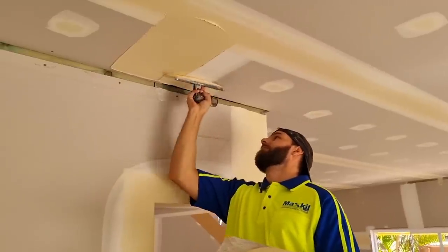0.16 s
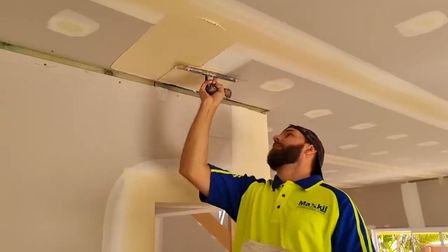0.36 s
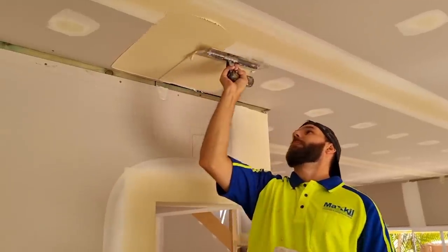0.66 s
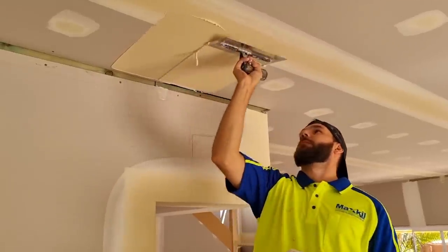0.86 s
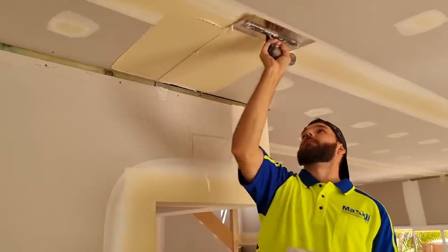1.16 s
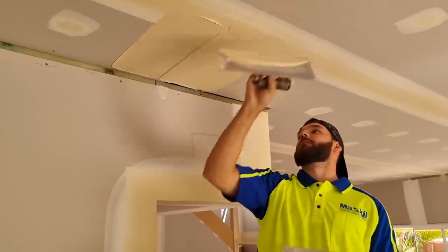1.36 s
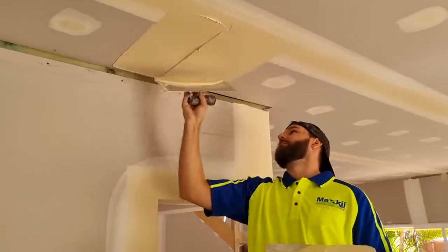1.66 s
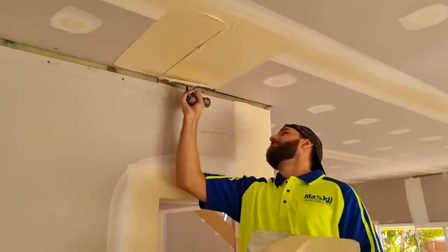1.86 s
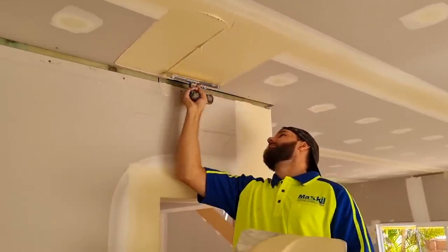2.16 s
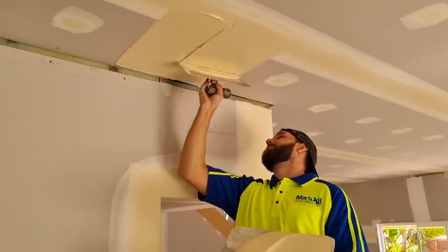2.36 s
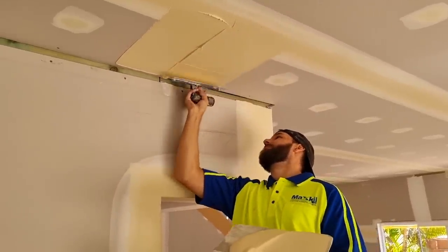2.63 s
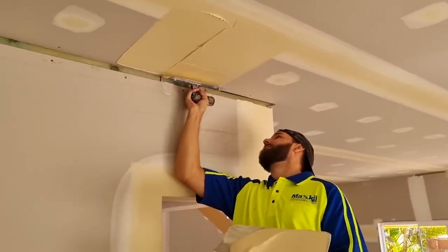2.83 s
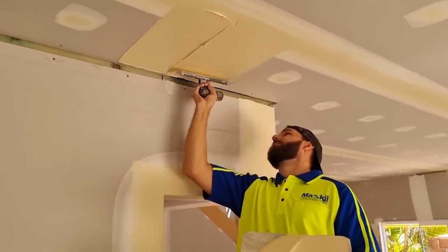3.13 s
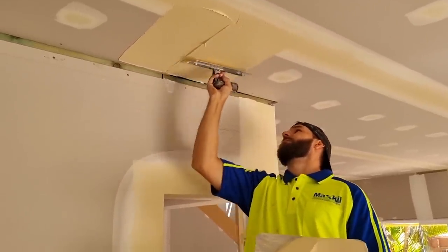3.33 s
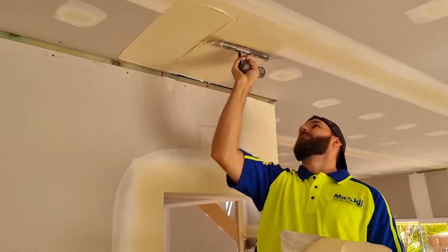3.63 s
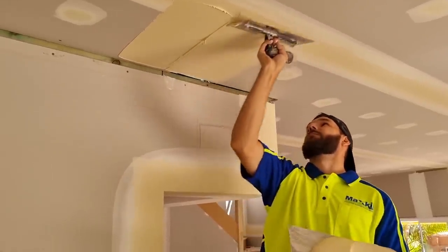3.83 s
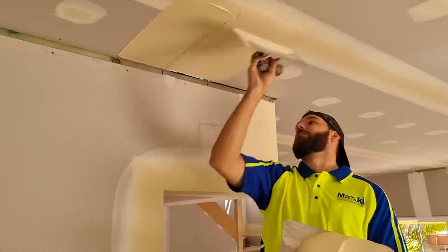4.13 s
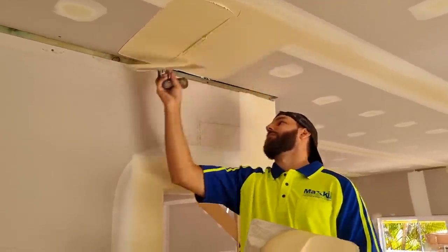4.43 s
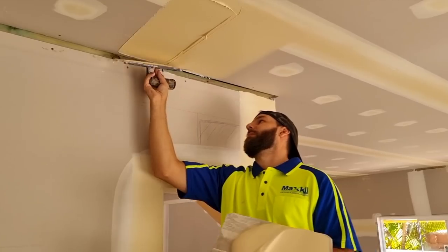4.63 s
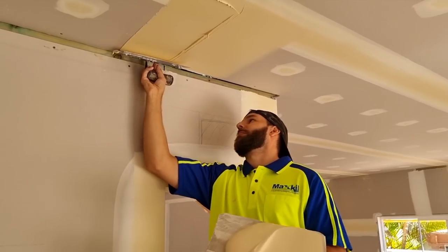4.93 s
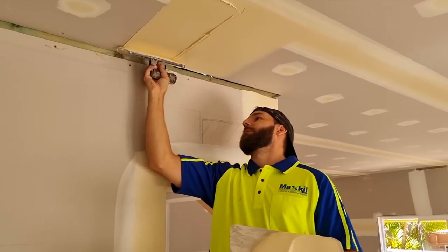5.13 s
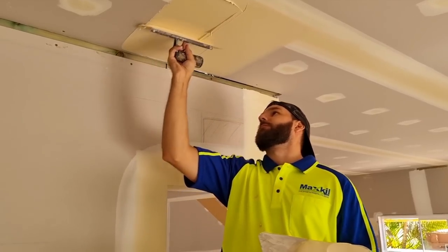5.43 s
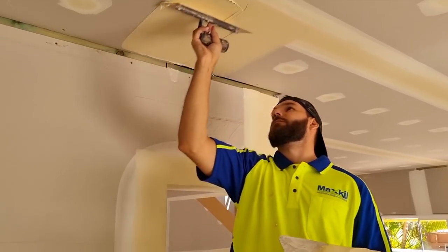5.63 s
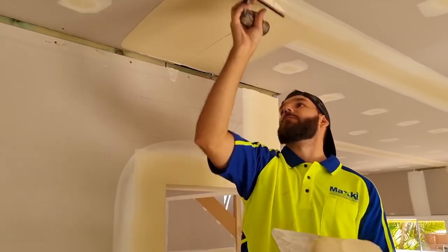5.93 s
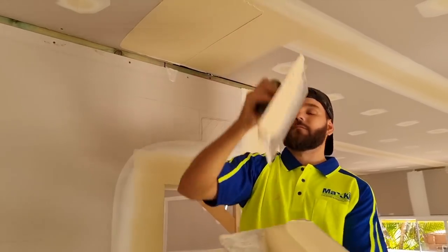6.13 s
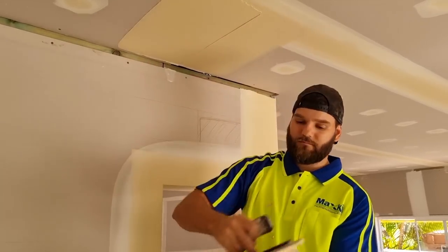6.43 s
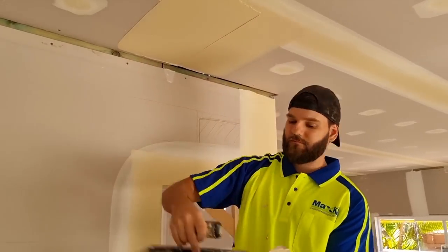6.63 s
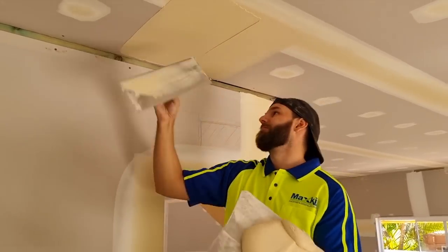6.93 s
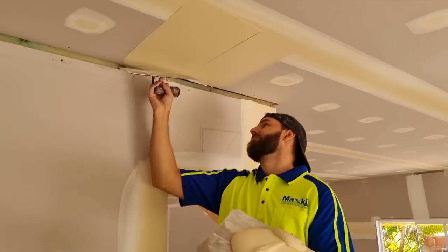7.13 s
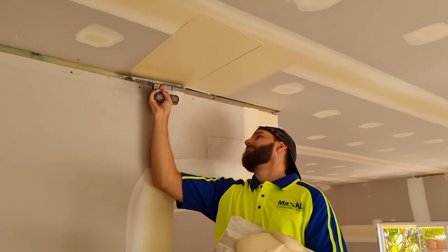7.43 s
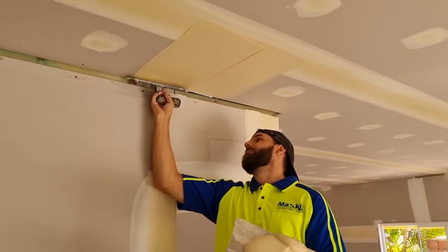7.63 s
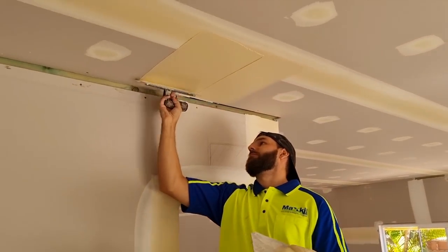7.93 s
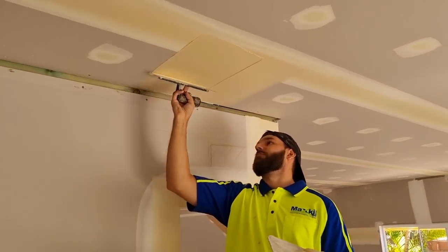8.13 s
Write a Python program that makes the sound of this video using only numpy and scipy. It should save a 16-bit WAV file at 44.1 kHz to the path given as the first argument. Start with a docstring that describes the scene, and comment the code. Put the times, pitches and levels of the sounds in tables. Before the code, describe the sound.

Gritty trowel strokes hiss over plasterboard, broken by steel clacks and low thuds in an empty, echoing room.

```python
"""A steel trowel spreads wet compound over a plasterboard ceiling in a bare, echoing house.
Grit under the edge hisses through the blade's resonances; the board rumbles, drones and thuds
under pressure. Steel clacks on steel and board. Clacks and scraping ring round the empty rooms,
over a soft outdoor wash."""
import sys
import numpy as np
from scipy import signal
from scipy.fft import rfft, irfft, next_fast_len
from scipy.io import wavfile
from scipy.ndimage import uniform_filter1d

SR = 44100
rng = np.random.default_rng(int(sys.argv[2]) if len(sys.argv) > 2 else 0)


def store_pcm(level_fs):
    """Save levels as 16-bit WAV."""
    pcm = np.round(np.clip(level_fs, -1, 1) * 32767).astype(np.int16)
    wavfile.write(sys.argv[1], SR, np.atleast_2d(pcm).T)


N = 365588
T = np.arange(N) / SR


def undb(db):
    """Decibels to gain."""
    return 10 ** (np.asarray(db) / 20)


def unit_rms(x):
    """Scale to rms 1."""
    return x / np.sqrt(np.mean(x ** 2))


def band(x, lo_hz, hi_hz, order=2):
    """Butterworth band-pass."""
    sos = signal.butter(order, [lo_hz, min(hi_hz, .45 * SR)], "bandpass", fs=SR, output="sos")
    return signal.sosfilt(sos, x)


def resonate(x, modes):
    """Flat response with resonances standing over it; minimum phase via the cepstrum."""
    size = next_fast_len(len(x))
    freq_hz = np.fft.rfftfreq(size, 1 / SR)
    power = 1 + sum(undb(2 * db) / (1 + (2 * (freq_hz - hz) / width_hz) ** 2)
                    for hz, width_hz, db in modes)
    cepstrum = irfft(np.log(power) / 2, size)
    cepstrum[1:size // 2] *= 2
    cepstrum[size // 2 + 1:] = 0
    return irfft(rfft(x, size) * np.exp(rfft(cepstrum)), size)[:len(x)]


def drift(rate_hz):
    """Random steps, smoothed twice; spread near 1."""
    hold = int(SR / rate_hz)
    steps = np.repeat(rng.standard_normal(N // hold + 1), hold)
    return 1.3 * uniform_filter1d(uniform_filter1d(steps, hold), hold)[:N]


# Lumps under the edge: (time [s], level jump [dB])
LUMPS = [(0.637, 5), (0.683, 5), (1.004, 6), (3.3, -1), (3.625, 11.5), (3.819, 8), (3.866, 6), (5.901, 11)]


def catches_db(decay_s=0.0046, small_per_s=31, small_mean_db=2.5):
    """The edge catches on lumps: a few marked level jumps among many small random ones."""
    jumps_db = (rng.random(N) < small_per_s / SR) * rng.exponential(size=N) * small_mean_db
    for time_s, db in LUMPS:
        jumps_db[int(time_s * SR)] = db
    return signal.lfilter([1], [1, -np.exp(-1 / (decay_s * SR))], jumps_db)


# Blade resonances: (frequency [Hz], width [Hz], relative gain [dB])
BLADE_MODES = [(1265, 60, 15), (2800, 400, 1), (3680, 150, 3), (4200, 150, 7), (4750, 300, 8),
               (5480, 200, 8), (5900, 250, 8), (6900, 300, 6), (7600, 200, 6), (8600, 250, 7),
               (9100, 350, 7), (13200, 700, 8), (15200, 400, 5)]


def blade(grit, ring_db):
    """The flexing blade presses unevenly, so each mode swells and fades on its own."""
    out = grit
    for hz, width_hz, db in BLADE_MODES:
        sway_db = 3.2 * drift(12) - 1
        mode = signal.lfilter(*signal.iirpeak(hz, hz / width_hz, fs=SR), grit)
        out = out + undb(db + sway_db + ring_db) * mode
    return out


# Edge pressure, one list per stroke: (time [s], relative grit level [dB])
STROKE_PRESSURE = [
    [(0.0, -31.5), (0.036, -33.5), (0.1, -41), (0.125, -36)],
    [(0.46, -45), (0.6, -46.5), (0.75, -47.5), (1.05, -43.5), (1.24, -43), (1.316, -40), (1.33, -59)],
    [(1.35, -71), (1.385, -60.5), (1.46, -74)],
    [(2.12, -66), (2.2, -65), (2.256, -49), (2.316, -51), (2.396, -47), (2.46, -61), (2.55, -50)],
    [(3.03, -63), (3.166, -49.5), (3.33, -44), (3.452, -35), (3.7, -37.5), (3.806, -33.5), (3.988, -46),
     (4.07, -37.5), (4.11, -63)],
    [(4.122, -47), (4.15, -31.5), (4.165, -50)],
    [(4.18, -60), (4.26, -43.5), (4.4, -48)],
    [(4.72, -51), (4.732, -35.5), (4.838, -38), (4.938, -54), (4.95, -43), (5.07, -67)],
    [(5.58, -42.5), (5.728, -52), (5.93, -46), (5.962, -32.5), (5.986, -45), (6.08, -72)],
    [(6.38, -27), (6.44, -26), (6.526, -16.5), (6.704, -28.5), (6.76, -47)],
    [(7.195, -73), (7.21, -56), (7.4, -69.5), (7.66, -84), (7.68, -52.5), (7.76, -72)],
    [(7.79, -63), (7.836, -48), (8.066, -43), (8.29, -35.5)],
]
# Tone per stroke: (top [dB re grit], hum [dB re grit], body [dB re grit],
# ring of the loaded blade [dB], lift-off rasp [dB])
STROKE_TONE = [(-13, 6.5, 6.5, -31, 0), (-6, -2.5, -4, -6.5, 8), (-20, 27.5, 22, -38, 1),
               (-9, -3.5, 4.5, -9.5, -11), (-5, -2.5, 1, -3.5, 7.5), (-25, -12, 11.5, -10, -1),
               (-18, 18, 9, -7, 0), (-15, 2.5, 4.5, -23, 0), (-7, 0.5, -6, -9, 11),
               (-3, -10.5, -10, -11.5, 4), (-10, 0, -2, -8, 0), (-3, 5, -1.5, 1, 0.5)]
# Scrape bands grit, top, hum, body: (low [Hz], high [Hz])
SCRAPE_BANDS = [(3500, 9500), (10500, 14900), (700, 1760), (1800, 4370)]
# Pressure response per band; the body lingers as the edge eases off: (slope [dB/dB])
PRESSURE_SLOPES = [0.95, 1.08, 1, 0.81]
# Drift per band as the blade tilts: (spread [dB])
TILT_DB = [0.8, 1.5, 1.8, 1.5]


def trowel_scrape(lift_s=0.033):
    """Dense grit with a few large grains shakes the blade; a lower rasp marks the lift-off."""
    slip_db = 1.2 * drift(70) + catches_db()
    gains, ring_db = np.zeros((len(SCRAPE_BANDS), N)), np.zeros(N)
    for stroke, (*tone_db, stroke_ring_db, rasp_db) in zip(STROKE_PRESSURE, STROKE_TONE):
        times_s, grit_db = np.transpose(stroke)
        contact = np.clip(np.minimum(T - times_s[0], times_s[-1] - T) / 0.003 + 1, 0, 1)
        on = contact > 0
        ring_db[on] = stroke_ring_db
        eased_db = np.interp(T[on], times_s, grit_db) - grit_db.max()
        lift_db = rasp_db * np.exp(-((T[on] - times_s[-1] + lift_s) / lift_s) ** 2)
        for gain, band_db, slope, is_low in zip(gains, [0] + tone_db, PRESSURE_SLOPES, (0, 0, 1, 1)):
            gain[on] += contact[on] * undb(grit_db.max() + band_db + slope * eased_db + is_low * lift_db)
    grit = 0
    for gain, (lo_hz, hi_hz), tilt_db in zip(gains, SCRAPE_BANDS, TILT_DB):
        noise = rng.standard_normal(N)
        grain_db = 2.15 * rng.exponential(size=N)
        grains = noise * undb(grain_db + slip_db + tilt_db * drift(14))
        grit = grit + gain * unit_rms(band(grains, lo_hz, hi_hz))
    return undb(-6.5) * blade(grit, ring_db)


# Board under load: (time [s], rumble [dB], drone [dB])
BOARD_LEVELS = [(0.0, -52, -45.5), (0.3, -53, -48), (0.4, -57, -44), (1.1, -57, -51.5),
                (1.27, -42.5, -46.5), (1.5, -67, -54.5), (1.75, -63.5, -53.5), (2.26, -49, -47),
                (2.9, -52, -44.5), (3.2, -56, -60), (3.29, -44, -41.5), (3.45, -46, -41.5),
                (3.75, -46, -45.5), (4.11, -52.5, -52), (4.25, -44.5, -39), (4.55, -49, -56),
                (5.15, -55, -47.5), (5.899, -60, -55.5), (5.98, -53, -50), (6.33, -73, -67),
                (6.38, -68, -27), (6.72, -62, -60), (7.15, -57, -63), (7.32, -48, -51.5),
                (7.59, -56, -58.5), (7.69, -49, -53.5), (7.8, -57, -55), (7.87, -54, -46), (8.1, -57, -47),
                (8.29, -48, -39.5)]
# Board resonances: (frequency [Hz], width [Hz], gain [dB])
BOARD_MODES = [(305, 60, 9), (435, 50, 9), (600, 60, 4)]


def board_flex():
    """The sheet flexes under the hand: low rumble and resonant drone."""
    times_s, rumble_db, drone_db = np.transpose(BOARD_LEVELS)
    rumble = unit_rms(band(rng.standard_normal(N), 56, 200))
    rumble *= undb(np.interp(T, times_s, rumble_db) + 2.4 * drift(25))
    drone = unit_rms(band(resonate(rng.standard_normal(N), BOARD_MODES), 150, 1200))
    drone *= undb(np.interp(T, times_s, drone_db) + 1.1 * drift(30))
    return rumble + drone


# Background spectrum: (frequency [Hz], relative density [dB])
AIR_SPECTRUM = [(15, -36), (25, 3), (76, 13), (206, -18), (285, -22), (659, -12), (1040, -0.5),
                (1840, -9.5), (6560, -13), (14800, -20), (16000, -19)]


def air_wash(level_db=-55.5):
    """Steady air of the house and the street beyond."""
    hz, db = np.transpose(AIR_SPECTRUM)
    size = next_fast_len(N)
    freq_hz = np.maximum(np.fft.rfftfreq(size, 1 / SR), 1)
    colour = undb(np.interp(np.log(freq_hz), np.log(hz), db))
    swell_db = .7 * drift(3)
    air = irfft(rfft(rng.standard_normal(size)) * colour, size)[:N]
    return undb(level_db + swell_db) * unit_rms(air)


# Steel blows: (time [s], edge peak [dB], top [dB re edge], hum [dB re edge], body [dB re edge],
# edge [Hz], body [Hz], body width [Hz], skid decay [ms], relative room send [dB])
STEEL_BLOWS = [ (0.112, -27.5, -11, -8, 3.5, 4500, 2340, 920, 13, 5.5),
               (.133, -17.5, -3, -9.5, -8, 5250, 2830, 700, 10.4, 7.5),
               (0.4365, -19.5, -9, -26, -5, 6650, 3700, 1500, 2, -7.5),
               (.457, -27, -21, -8, -30, 4730, 2760, 800, 5.3, -2.5),
               (1.729, -14, -6, -19, -13, 5580, 2380, 605, 5.1, -3.5),
               (4.153, -8, -13, -20.5, 1, 5970, 2870, 1300, 7.5, -0.5),
               (4.725, -34.5, -6, 5.5, 1, 4630, 2380, 1580, 5.5, -3),
               (4.7796, -30, -20, -2, 4, 5070, 2500, 1220, 3.2, 0),
               (4.9487, -32.5, -9, 0, 5, 6550, 2130, 890, 9.9, -3),
               (5.084, -16.5, -1.5, -16, -5.5, 5680, 2520, 1800, 6.6, 3.5),
               (5.429, -20.5, -12, -8.5, 1, 5450, 2080, 1800, 9.5, -2.5),
               (5.6, -26.5, -9, -26, -6, 4400, 3140, 800, 5.5, -11),
               (6.3602, -6, -10, 3.5, 0.5, 7000, 2820, 1550, 3.9, -14.5),
               (6.388, -17, -8, 3.5, -11, 8960, 2190, 800, 2.7, -8.5),
               (6.424, -6.5, -11, 0.5, -5.5, 7200, 2450, 800, 4.3, -14.5),
               (6.474, -13, -14, -20, -8.5, 5740, 2200, 800, 1.9, -5),
               (6.502, -10.5, -20, -34, -10, 6030, 3220, 500, 3.2, -3.5),
               (6.555, -12.5, -23, -8.5, -30, 5800, 3220, 820, 9.9, -23),
               (6.879, -14, -8, -20.5, -1.5, 6040, 2350, 760, 4.8, -6.5),
               (7.853, -38, -15, 15, -8, 4300, 2300, 1200, 6, -5.5),
               (8.207, -25, -18, -10, -27.5, 4330, 2820, 800, 6.3, -14)]
# Steel resonances: (frequency [Hz], width [Hz], gain [dB])
STEEL_MODES = [(1240, 50, 7), (2476, 35, 5), (2770, 30, 8), (3270, 30, 6), (3380, 30, 5), (3536, 30, 5),
               (3678, 25, 6), (4532, 30, 5), (5627, 35, 6), (5803, 35, 6), (6407, 40, 6)]


def steel_clacks(attack_skids=0.063, knock_re_hum_db=-9):
    """Each blow is a short skid heard directly and one ringing pulse sent to the room."""
    size = int(.05 * SR)
    t = T[:size]
    pulse = signal.unit_impulse(size)
    direct, send = np.zeros(N + size), np.zeros(N + size)
    for blow in STEEL_BLOWS:
        time_s, edge_db, top_db, hum_db, body_db, edge_hz, body_hz, width_hz, skid_ms, send_db = blow
        age_skids = 1000 * t / skid_ms
        burst = rng.standard_normal(size) * np.exp(-age_skids) * (1 - np.exp(-age_skids / attack_skids))
        start = int(time_s * SR)
        bands = [(hum_db + knock_re_hum_db, 250, 700),
                 (hum_db, 700, 1600),
                 (body_db, body_hz - width_hz / 2, body_hz + width_hz / 2),
                 (0, edge_hz / 1.51, edge_hz * 1.395),
                 (top_db, 8000, 14000)]
        for k, (band_db, lo_hz, hi_hz) in enumerate(bands):
            skid, click = band(np.array([burst, pulse]), lo_hz, hi_hz, order=3 if hi_hz > 5000 else 2)
            skid *= undb(edge_db + band_db) / np.abs(skid).max()
            click *= np.sqrt(np.sum(skid ** 2) / np.sum(click ** 2))
            direct[start:start + size] += skid
            # alternating signs fill the valleys between bands
            send[start:start + size] += (-1) ** k * undb(send_db) * click
    return direct[:N], resonate(send[:N], STEEL_MODES)


# Soft blows on the board: (time [s], level before the attack ramp [dB], pitch [Hz], t60 [s])
BOARD_BLOWS = [(0.433, -40, 152, 0.78), (.68, -41, 126, 0.87), (1.139, -38, 83, 0.55),
               (1.2, -36, 130, 0.23), (2.233, -28.5, 74, 0.25), (2.243, -32, 133, 0.24),
               (3.267, -21.5, 154, 0.17), (3.266, -20, 96, 0.4), (3.273, -23, 65.8, 0.74),
               (3.679, -37, 96.7, 0.43), (4.199, -39.5, 66.3, 1), (4.547, -34.5, 127, 0.42),
               (4.859, -37.5, 78, 0.73), (5.954, -31.5, 95, 0.2), (6.358, -27, 91.6, 0.43),
               (7.679, -37, 95, 0.18), (8.15, -38.5, 240, 0.76)]


def board_thuds(attack_s=0.0069):
    """Each soft blow excites one low, decaying mode of the board."""
    out = np.zeros(N + SR)
    t = T[:SR]
    attack = 1 - np.exp(-t / attack_s)
    for time_s, db, hz, t60_s in BOARD_BLOWS:
        start = int(time_s * SR)
        out[start:start + SR] += attack * undb(db - 60 * t / t60_s) * np.sin(2 * np.pi * hz * t)
    return out[:N]


# Room decay: (frequency [Hz], t60 [s])
ROOM_DECAY = [(125, .9), (500, 1.1), (1200, 1.1), (2500, .85), (5000, .65), (9000, .48), (14000, .33)]


def room(x, build_up_s=0.0098):
    """Dense reverberation of bare rooms; the treble dies first."""
    t = T[:int(1.2 * SR)]
    hz, t60_s = np.transpose(ROOM_DECAY)
    tail = 0
    for centre_hz in 63 * 2 ** np.arange(0, 8.1, .5):
        band_t60_s = np.interp(np.log(centre_hz), np.log(hz), t60_s)
        reflections = band(rng.standard_normal(len(t)), centre_hz / 2 ** .25, centre_hz * 2 ** .25)
        tail = tail + reflections * undb(-60 * t / band_t60_s)
    tail *= 1 - np.exp(-t / build_up_s)
    return signal.fftconvolve(x, tail / np.sqrt(np.sum(tail ** 2)))[:N]


def scene():
    """Mono mix; only scrape and clacks feed the room."""
    scrape = trowel_scrape()
    clacks, clack_send = steel_clacks()
    reverb = room(undb(0.5) * clack_send + undb(-13.5) * scrape)
    return (undb(-3.0) * scrape + board_flex() + air_wash() + clacks + board_thuds() + reverb)[None]


def record(dry):
    """Soft saturation rounds the loudest peaks; a steep low-pass cuts the top."""
    cutoff_hz = 15900
    return signal.sosfilt(signal.ellip(10, .2, 60, cutoff_hz, fs=SR, output="sos"), np.tanh(dry))


dry = scene()
out = record(dry)
store_pcm(out)
```